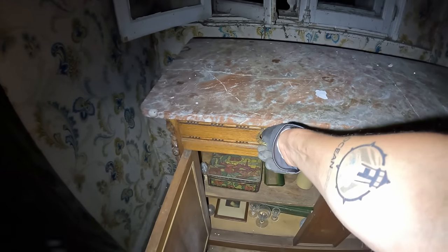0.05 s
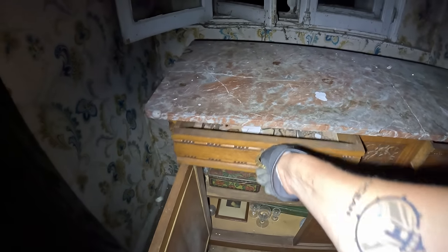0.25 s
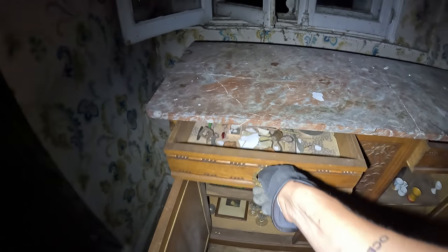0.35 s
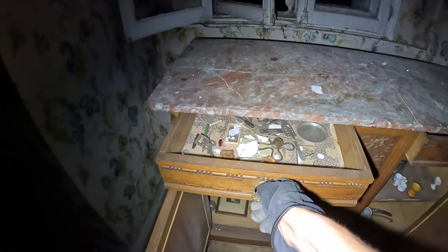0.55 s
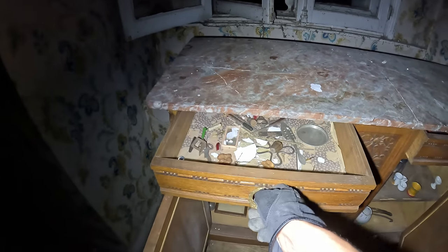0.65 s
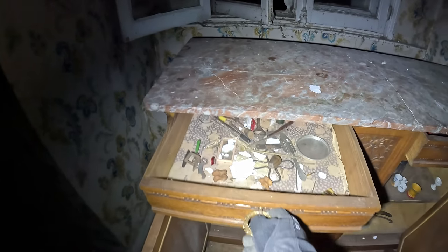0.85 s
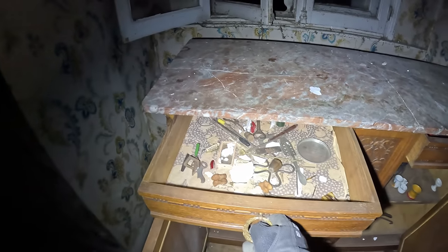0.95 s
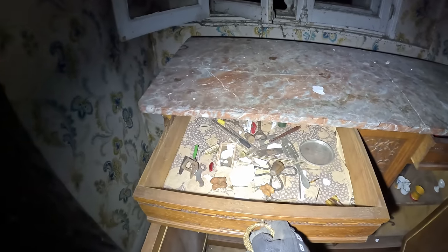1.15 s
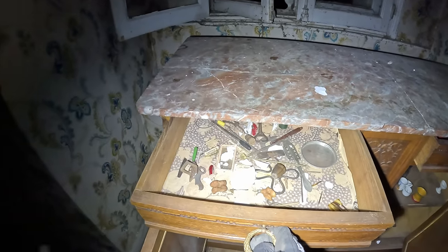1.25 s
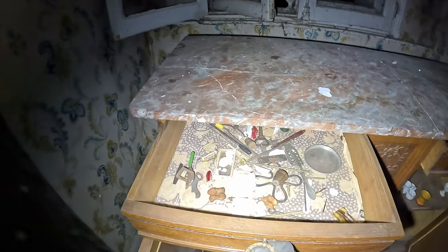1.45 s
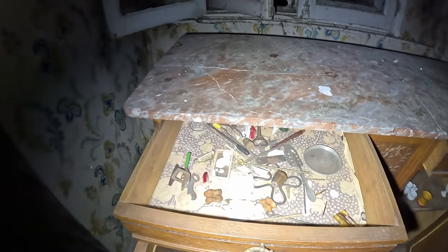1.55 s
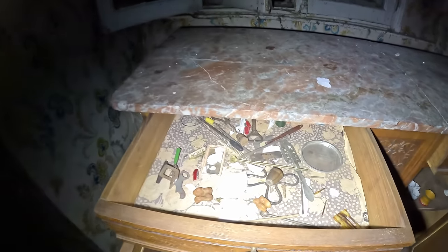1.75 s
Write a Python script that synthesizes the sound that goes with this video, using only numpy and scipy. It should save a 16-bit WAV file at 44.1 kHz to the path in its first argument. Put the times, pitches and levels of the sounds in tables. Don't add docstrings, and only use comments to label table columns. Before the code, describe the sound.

Close up in a hushed abandoned house, a stuck drawer breaks free with hard wooden knocks, drags out with a low grinding rumble and gritty hiss, light metal rattles, then soft clacks and a faint brush.

```python
import sys
import numpy as np
from scipy import signal
from scipy.fft import rfft, irfft
from scipy.io import wavfile
from scipy.ndimage import uniform_filter1d

SR = 44100
rng = np.random.default_rng(int(sys.argv[2]) if len(sys.argv) > 2 else 0)


def field_ratio(decibels):
    return 10 ** (np.asarray(decibels, dtype=float) / 20)


def bounce(signal):
    frames = np.transpose(np.atleast_2d(signal))
    limited = np.clip(frames, -1, 1)
    pcm = np.round(limited * 32767).astype(np.int16)
    wavfile.write(sys.argv[1], SR, pcm)


N = 79380


def evened(x):
    return x / np.sqrt(np.mean(x ** 2) + 1e-20)


def read(points, hz):
    point_hz, value = np.transpose(points)
    return np.interp(np.log(hz + 1), np.log(point_hz + 1), value)


def follow(rows, column):
    rows = np.asarray(rows)
    return np.interp(np.arange(N) / SR, rows[:, 0], rows[:, column])


def add(mix, start_s, sound):
    part = mix[..., round(start_s * SR):][..., :sound.shape[-1]]
    part += sound[..., :part.shape[-1]]


def colour(x, points):
    n = x.shape[-1]
    gain = field_ratio(read(points, np.fft.rfftfreq(n, 1 / SR)))
    return irfft(rfft(x) * gain, n)


def ring(x, hz, width_hz):
    r = np.exp(-np.pi * width_hz / SR)
    return signal.lfilter([1 - r, 0, r - 1], [1, -2 * r * np.cos(2 * np.pi * hz / SR), r * r], x)


def clicks(per_s, spread_db):
    chance, size, sign = rng.random(N), rng.exponential(1, N), rng.choice([-1., 1.], N)
    return (chance < per_s / SR) * field_ratio(spread_db * np.minimum(size, 4)) * sign


def grit(spectrum):
    per_s, spread_db = 6400, 3.4
    mid, side = clicks(per_s, spread_db), clicks(per_s, spread_db)
    side = colour(side, [(1000, -5.5), (9000, -9), (13000, -5)])
    return evened(colour(np.array([mid + side, mid - side]), spectrum))


# time_s, runner_load_db, rub_speed_db
SLIDE = [(.12, -96, -84), (.14, -41.5, -53), (.195, -53, -67), (.215, -24, -31), (.295, -23.5, -35.5),
         (.335, -13, -38), (.4, -19.5, -41), (.48, -24.5, -42), (.62, -32, -48), (.78, -38, -54.5),
         (.92, -34, -51), (1.02, -32, -49.5), (1.075, -35, -63), (1.2, -40.5, -61.5), (1.32, -54.5, -65)]
# mode_hz, width_hz, level_db
BOX_MODES = [(159, 28, -6), (200, 40, 3), (255, 43, -5.5), (301.1, 27, 1.5), (360, 90, -3),
             (486, 140, -6.5), (603, 82, -13.5), (790, 60, -24), (890, 30, -14), (1130, 140, -56.5)]


def judder():
    slips_per_s, spread_db, soft_hz, level_db = 1100, 3, 1380, -3.5
    b, a = signal.butter(2, soft_hz, fs=SR)
    slips = signal.lfilter(b, a, clicks(slips_per_s, spread_db))
    modes = [field_ratio(db) * evened(ring(slips, hz, width_hz)) for hz, width_hz, db in BOX_MODES]
    unstrained_rms = np.sqrt(np.mean(sum(modes) ** 2))
    load_db = follow(SLIDE, column=1)
    strain_db = np.clip(load_db + 18, -30, 9)
    box = np.zeros(N)
    for mode, (hz, _, _) in zip(modes, BOX_MODES):
        tilt = np.log10(hz / 200) * (hz > 300)
        box += mode * field_ratio(strain_db * tilt)
    return field_ratio(load_db + level_db) * colour(box, [(90, 2.5), (140, 1.5)]) / unstrained_rms


# freq_hz, density_db_per_hz
RUB_SPECTRUM = [(400, -19), (900, -2.5), (1400, -10.5), (3900, -11.5), (9900, -28), (11500, -43),
                (15500, -42)]


def rub():
    level_db = 5
    return field_ratio(level_db + follow(SLIDE, column=2)) * grit(RUB_SPECTRUM)


# start_s, level_db, crack_db, tilt_db_per_octave
CLACKS = [(0.134, -34.5, -6, 2.5), (0.196, -28, -10, -3), (0.2075, -14.5, 4, -1), (0.212, -4, -2, -1),
          (0.221, -11, -33, -8.5), (0.306, -12.5, -40, -5), (.311, -13, -40, -2), (0.3245, -4, -40, -4.5),
          (0.331, -5, -40, -11), (1.198, -23, -4.5, -0.5), (1.203, -12, -16, 0), (1.545, -19, -17, 0),
          (1.608, -25.5, -25, 5)]
CLACK_PITCH = [.85, 1, 1, 1, .9, .5, .72, .55, .83, 1, 1, .99, .99]
SLAT_HZ = [910, 1130, 1700, 2220, 2460, 2830, 3400]
# level_db, t60_s
SLAT_DECAY = [(-6, .035), (-4, .04), (0, .035), (0, .035), (-5, .025), (-3, .03), (-9, .015)]


def clacks():
    level_db, pan_db, rise_s, scatter_db = 1, -4.5, .0018, 1.2
    crack_decay_s, crack_trim_db = .002, -3.5
    rattle_decay_s, rattle_db, rattle_send_db = .012, -16, 6
    crack_spectrum = [(2500, -36), (5500, 6), (9000, -16), (12000, -42), (15000, -62)]
    rattle_spectrum = [(600, -35), (900, 0), (3300, -3), (4500, -18), (20000, -75)]
    out, t = np.zeros((3, N)), np.arange(6000) / SR
    rise = np.sin(np.pi / 2 * np.minimum(t / rise_s, 1)) ** 2
    spots = rng.standard_normal((len(CLACKS), len(SLAT_HZ), 3))
    noises = rng.standard_normal((len(CLACKS), 2, len(t)))
    for (start_s, db, crack_db, tilt_db), ratio, spot, noise in zip(CLACKS, CLACK_PITCH, spots, noises):
        modes = np.zeros(len(t))
        for hz, (mode_db, t60_s), chance in zip(SLAT_HZ, SLAT_DECAY, spot):
            mode_db = mode_db + tilt_db * np.log2(hz / 1700) + scatter_db * chance[0]
            struck_hz = hz * ratio * (1 + chance[1] / 200)
            wave = np.sin(2 * np.pi * struck_hz * t + .5 * chance[2])
            modes += field_ratio(mode_db - 60 * t / t60_s) * wave
        crack = colour(noise[0], crack_spectrum) * np.exp(-t / crack_decay_s)
        band = [(f * ratio, d + tilt_db * np.log2(f / 1700)) for f, d in rattle_spectrum]
        rattle = evened(colour(noise[1], band)) * np.exp(-t / rattle_decay_s)
        rattle = field_ratio(rattle_db) * rattle * rise
        hit = modes / 3 * rise + rattle + field_ratio(crack_db + crack_trim_db) * crack
        sides = hit * field_ratio([[pan_db / 2], [-pan_db / 2]])
        send = hit + field_ratio(rattle_send_db) * rattle
        add(out, start_s, field_ratio(db + level_db) * np.vstack([sides, send]))
    return out[:2], out[2]


# start_s, level_db, pitch_hz, t60_s
THUDS = [(0.001, -46, 217, 0.076), (0.214, -21, 214, 0.066), (0.224, -21, 251, 0.03),
         (0.246, -24.5, 92, 0.1), (0.257, -18.5, 241, 0.054), (.268, -17, 255, 0.032),
         (0.285, -17.5, 274, 0.064), (.305, -18, 200, 0.035), (0.327, -13, 227.6, 0.097),
         (0.342, -6, 200, 0.019), (.351, -9.5, 255, 0.033), (.378, -12.5, 260, 0.028),
         (0.391, -13.5, 216.5, 0.12), (0.421, -14, 253, 0.028), (.457, -22, 298, 0.045),
         (0.473, -22.5, 194.2, .09), (.503, -29, 343, 0.075), (0.533, -29.5, 50, 0.16),
         (.534, -27, 116, 0.15), (0.549, -27, 256, 0.12), (0.58, -23.5, 153, 0.2), (0.917, -29, 200, 0.3),
         (.985, -29, 201.5, 0.17), (1.017, -32, 51.6, 0.03), (1.053, -21, 339, 0.028),
         (1.093, -32, 341, 0.067), (1.2, -36, 360, 0.12), (1.226, -47, 250, 0.18), (1.547, -49, 400, 0.094),
         (1.693, -30.5, 378, 0.075), (1.717, -37, 362, 0.033), (1.755, -35.5, 360, 0.04),
         (1.775, -40, 340, 0.04), (1.085, -45, 125, .12)]


def thuds():
    rise_s, trim_db = .0033, -0.5
    out, t = np.zeros(N), np.arange(8000) / SR
    for start_s, db, hz, t60_s in THUDS:
        shape = (1 - np.exp(-t / rise_s)) ** 2 * field_ratio(-60 * t / t60_s)
        add(out, start_s, field_ratio(db + trim_db) * shape / shape.max() * np.sin(2 * np.pi * hz * t))
    return out


# start_s, level_db, pitch_hz, t60_s, tick_db
TINKS = [(0.386, -33.5, 6100, 0.025, -1), (0.41, -34.5, 6600, 0.022, 3.5), (.405, -49, 9420, 0.054, -18),
         (.407, -53, 10540, 0.05, -18), (.406, -53, 13460, .05, -20), (0.46, -39, 6130, 0.049, -20),
         (.536, -45.5, 6514, 0.091, -10), (.536, -46.5, 10000, 0.056, -20), (.536, -56, 14200, .07, -20),
         (0.63, -36.5, 3700, 0.027, -10), (1.04, -44, 5900, 0.017, 6.5), (0.99, -51, 9700, 0.015, 14),
         (0.67, -24, 1100, 0.011, -23), (1.119, -33.5, 1130, 0.081, -21), (1.135, -42, 1000, 0.042, -25),
         (.236, -21, 1230, 0.06, -30), (.255, -21.5, 1230, 0.055, -30), (.252, -28, 2100, 0.12, -30),
         (1.046, -44, 8330, 0.19, 6), (1.051, -40, 8400, 0.036, 6), (1.046, -34, 7950, 0.065, 0),
         (1.043, -34, 8750, 0.04, -2), (1.04, -33.5, 4040, 0.057, -16.5), (1.05, -34, 3350, 0.041, 6.5),
         (1.13, -36.5, 6400, 0.017, -6), (1.119, -37, 5000, 0.037, 5), (1.119, -41.5, 7780, 0.028, 4.5),
         (1.2, -38.5, 4980, 0.021, -9), (1.28, -45, 4950, 0.027, -8), (1.385, -51.5, 4970, 0.02, -21),
         (1.72, -44, 3690, 0.097, -14), (1.43, -57.5, 6000, .015, 4)]


def tinks():
    split_ratio, upper_db, tick_decay_s, rise_s = 1.02, -8, .005, .0012
    tick_spectrum = [(1200, 0), (3500, 0), (10000, -5.5), (15000, -21)]
    out, t = np.zeros((2, N)), np.arange(8000) / SR
    noises = rng.standard_normal((len(TINKS), 3, len(t)))
    for (start_s, db, hz, t60_s, tick_db), noise in zip(TINKS, noises):
        pair = np.sin(2 * np.pi * hz * t) + field_ratio(upper_db) * np.sin(2 * np.pi * hz * split_ratio * t)
        half_shared = noise[:2] + noise[2]
        tick = colour(half_shared, tick_spectrum) * np.exp(-t / tick_decay_s)
        tink = pair * field_ratio(-60 * t / t60_s) + field_ratio(tick_db) * tick
        add(out, start_s, field_ratio(db) * np.minimum(t / rise_s, 1) * tink)
    return out


# freq_hz, density_db_per_hz
BRUSH_SPECTRUM = [(700, -30), (1100, 2), (3300, -3), (5300, -1), (7000, -7), (9800, -4), (15000, -24)]


def brush():
    start_s, rise_s, end_s, fall_s, level_db = 1.612, .025, 1.692, .014, -49
    t = np.arange(N) / SR
    shape = np.clip((t - start_s) / rise_s, 0, 1) * np.clip((end_s - t) / fall_s, 0, 1)
    return field_ratio(level_db) * shape * grit(BRUSH_SPECTRUM)


# freq_hz, t60_s
WALL_T60 = [(150, 0.14), (400, .6), (700, 0.52), (1000, 0.83), (2500, 0.71), (5000, 0.3), (10000, 0.15)]
# freq_hz, level_db
WALL_COLOUR = [(150, -7.5), (680, -6), (950, 0.5), (3200, -6), (5000, 0.5), (10000, 2.5)]


def walls(x):
    likeness, spacing = 0.6, 20
    at = np.arange(200, SR - spacing, spacing)
    at = at + rng.integers(0, spacing, (3, len(at)))
    taps = np.zeros((3, SR))
    np.put_along_axis(taps, at, rng.choice([-1., 1.], at.shape), 1)
    taps = np.sqrt(likeness) * taps[2] + np.sqrt(1 - likeness) * taps[:2]
    hz, t, z = signal.stft(taps, SR, nperseg=256)
    decay_db = read(WALL_COLOUR, hz)[:, None] - 60 * t / read(WALL_T60, hz)[:, None]
    tail = signal.istft(z * field_ratio(decay_db), SR, nperseg=256)[1]
    tail = tail / np.linalg.norm(tail[0]) * 0.5
    return signal.fftconvolve(x[None], tail, axes=1)[:, :N]


# time_s, level_db
HEAVE = [(0, -55), (.2, -51), (.45, -42), (.56, -34), (.65, -52), (.96, -54), (1.03, -45.5), (1.2, -40),
         (1.32, -57), (1.65, -53), (1.8, -52)]


def heave():
    trim_db = -2
    spectrum = [(8, 14), (15, 6), (28, 6), (48, 18), (75, 0), (200, -50)]
    low = colour(rng.standard_normal(N), spectrum)
    return field_ratio(follow(HEAVE, column=1) + trim_db) * evened(low)


# freq_hz, density_db_per_hz
HUSH_SPECTRUM = [(50, -13), (95, -20), (170, -2), (330, -16), (680, -43), (1050, -20), (3500, -40),
                 (7500, -48), (10000, -45), (15500, -54)]
# freq_hz, left_right_likeness
HUSH_LIKENESS = [(300, 0.83), (1500, 0.2)]


def hush():
    level_db, patch_db, size, hop = -51, 2.2, 1024, 256
    hz = np.fft.rfftfreq(size, 1 / SR)
    a, b, c, d, patches = rng.standard_normal((N // hop + 5, len(hz), 5)).T
    patches = uniform_filter1d(patches, size=10, axis=0)
    patches = evened(uniform_filter1d(patches, size=12, axis=1))
    same = np.clip(read(HUSH_LIKENESS, hz), -1, 1)[:, None]
    left = a + 1j * b
    right = same * left + np.sqrt(1 - same ** 2) * (c + 1j * d)
    z = np.array([left, right]) * field_ratio(read(HUSH_SPECTRUM, hz)[:, None] + patch_db * patches)
    air = signal.istft(z, nperseg=size, noverlap=size - hop)[1][:, :N]
    return field_ratio(level_db) * evened(air)


def scene():
    drag_send_db, clack_send_db = -4, -5
    hits, hits_send = clacks()
    drag = judder() + thuds() + rub() + tinks() + brush()
    wet = walls(field_ratio(drag_send_db) * drag.mean(0) + field_ratio(clack_send_db) * hits_send)
    return drag + hits + wet + heave() + hush()


def roll_off(x):
    return signal.sosfilt(signal.butter(12, 15800, fs=SR, output="sos"), x)


# freq_hz, left_minus_right_db
LEAN = [(200, -0.5), (1300, -1), (4000, 0.4), (8000, 2)]
# freq_hz, level_db
TOP_END = [(11000, 0), (15600, -11), (15850, -14), (15950, -80)]


def record(dry):
    left = colour(dry[0], [(hz, db / 2) for hz, db in LEAN])
    right = colour(dry[1], [(hz, -db / 2) for hz, db in LEAN])
    return roll_off(colour(np.array([left, right]), TOP_END))


dry = scene()
out = record(dry)
bounce(out)
```